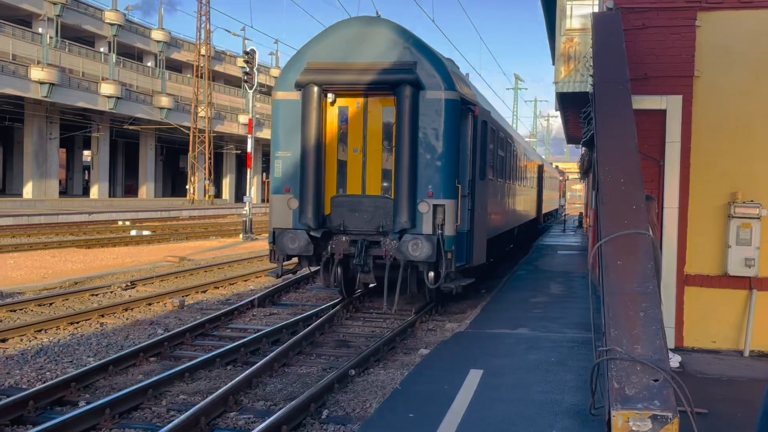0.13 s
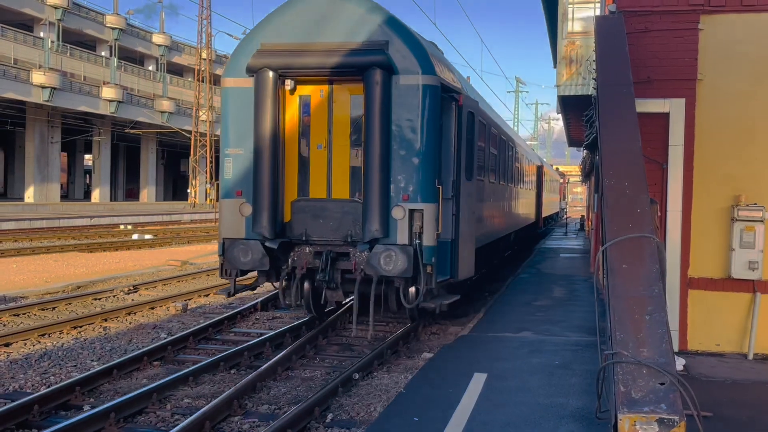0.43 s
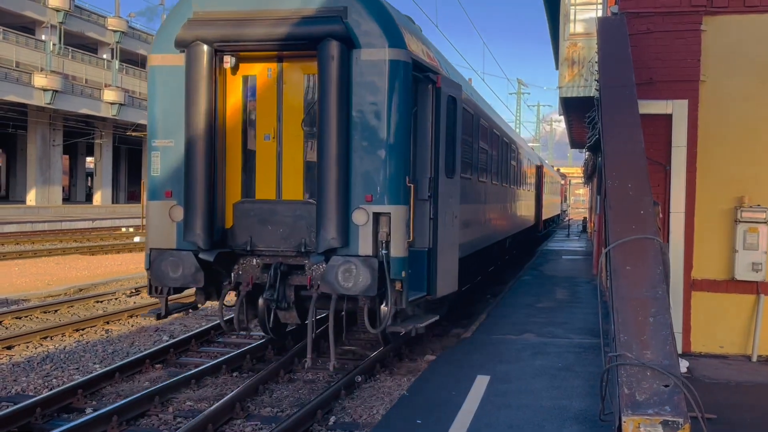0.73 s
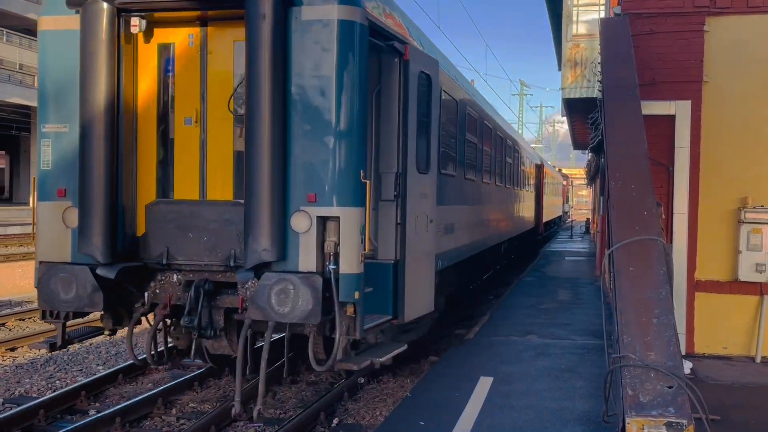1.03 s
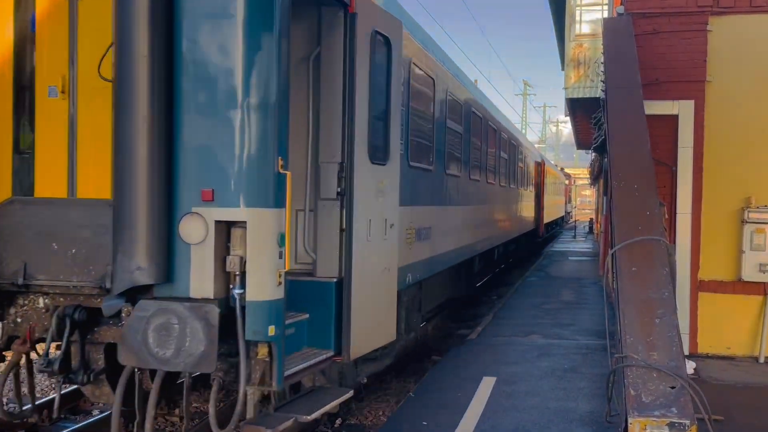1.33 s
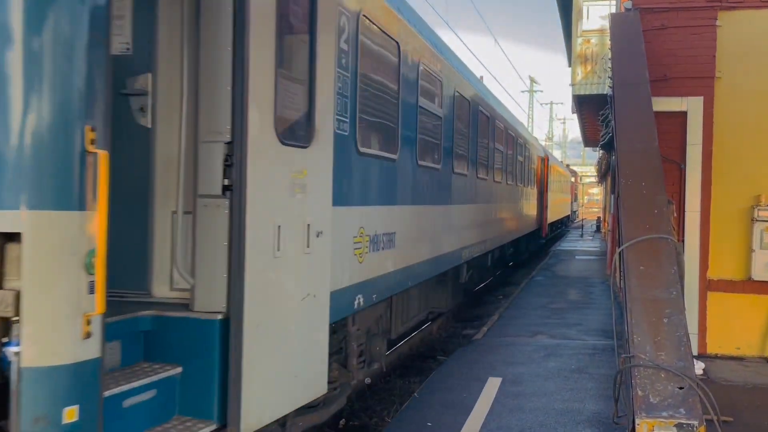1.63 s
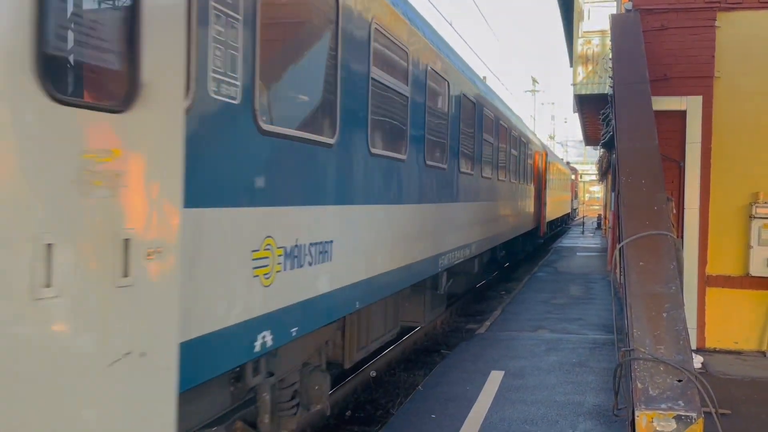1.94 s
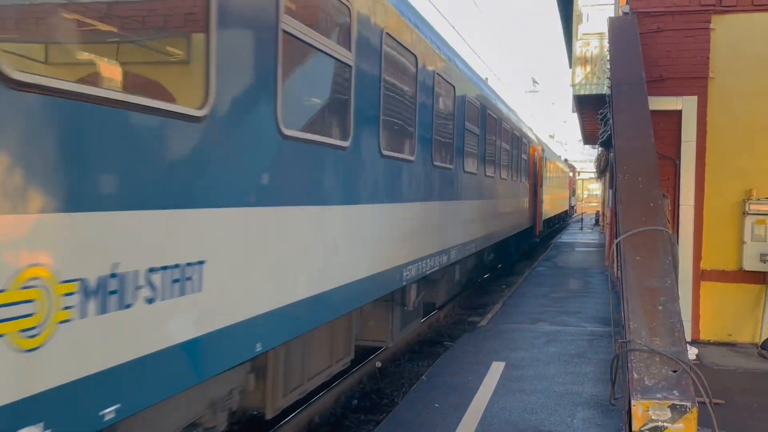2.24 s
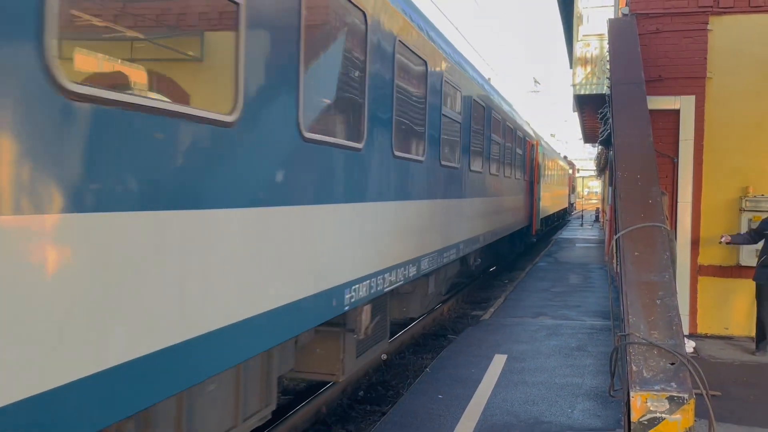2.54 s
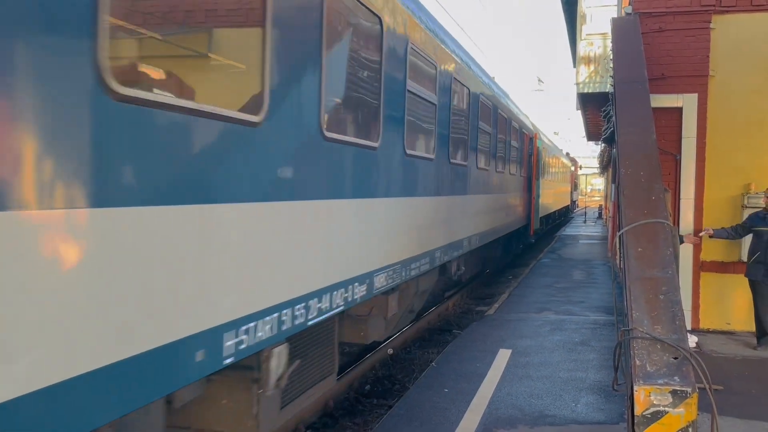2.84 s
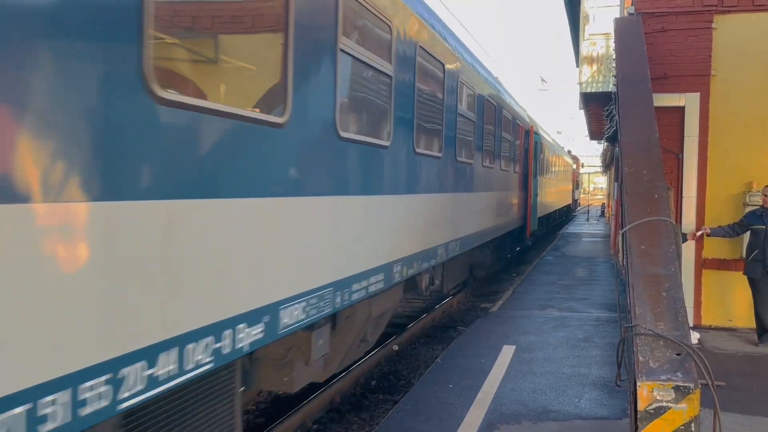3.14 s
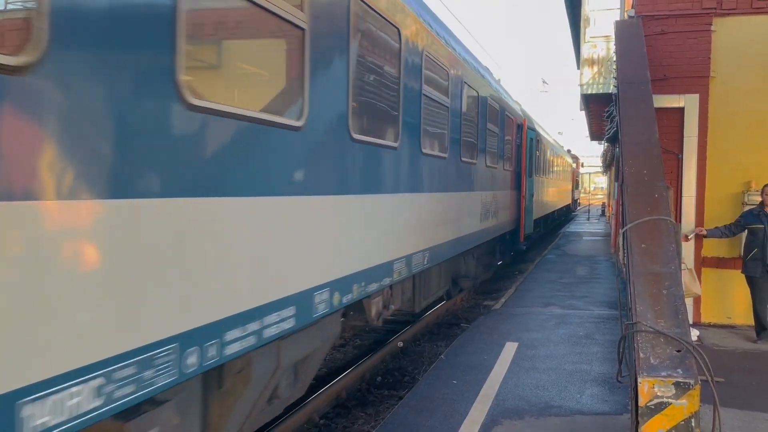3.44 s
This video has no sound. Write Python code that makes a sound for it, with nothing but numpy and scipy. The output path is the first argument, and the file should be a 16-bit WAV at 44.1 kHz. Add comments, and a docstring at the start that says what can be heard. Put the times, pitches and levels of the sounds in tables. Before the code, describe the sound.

Train carriages roll slowly past close to a stereo microphone on an open station platform; heavy clack-thumps cluster in the first second, a quieter rolling stretch follows, then more hard knocks until the end.

```python
"""Station platform, beside the track: passenger carriages roll slowly over points, close to the microphone.
Shaped noise makes the rumble, body drone and wheel roar, with small ringing jolts among them.
At each rail joint a pitched knock sets off a noisy clatter and boom; damped low tones thump as weight lands.
Flanges scrape in the curve, fittings clink and a hollow part clonks; decaying noise gives the walls' answer."""
import sys
import numpy as np
from scipy import signal
from scipy.fft import rfft, irfft, next_fast_len
from scipy.io import wavfile
from scipy.ndimage import map_coordinates

SR = 44100
rng = np.random.default_rng(int(sys.argv[2]) if len(sys.argv) > 2 else 0)


def unload_wav(signal):
    """Save mono or channel-first audio to the path in sys.argv[1] as 16-bit WAV at rate SR, clipped to [-1, 1]."""
    wavfile.write(
        sys.argv[1],
        SR,
        np.round(np.clip(np.atleast_2d(signal).T, -1, 1) * 32767).astype(np.int16),
    )


N = 157437

# Table levels are relative: the trims below and the filters still act on them.
# Rolling noise as it passes: t/s, rumble level/dB, body drone level/dB, wheel roar level/dB
ROLLING_LEVELS = [(.05, -20.5, -30, -30), (.31, -22.5, -27.5, -35), (.6, -23.5, -29.5, -35.5),
                  (0.8, -26, -28.5, -34), (1.15, -31.5, -34, -36), (1.65, -26.5, -28, -33),
                  (1.95, -34, -29, -31.5), (2.25, -25, -24.5, -30.5), (2.48, -28.5, -27, -28),
                  (2.7, -25, -27.5, -31), (3.0, -27.5, -28.5, -29), (3.56, -29.5, -29, -29.5)]
RUMBLE_TRIM_DB, DRONE_TRIM_DB, ROAR_TRIM_DB = 2, 1, 0
# Spectrum of the shaken bogies: f/Hz, level/dB
RUMBLE_SPECTRUM = [(24, -28), (38, -8), (56, 0.5), (85, 0.5), (110, -2.5), (165, -1.5), (250, -24),
                   (600, -94)]
# Spectrum of the car body: f/Hz, level/dB
DRONE_SPECTRUM = [(130, -21.5), (195, -1.5), (230, -6.5), (255, 0.5), (290, -5), (335, -4.5), (385, -12),
                  (1200, -125)]
# Spectrum of wheels on the rail: f/Hz, level/dB
ROAR_SPECTRUM = [(200, -38), (430, 2), (900, 0), (1200, -6.5), (1800, -11.5), (2500, -14), (2900, -17.5),
                 (5200, -26.5), (7000, -33), (9000, -41), (15500, -59)]
# Spectrum of the rattling bogie: f/Hz, level/dB
CLATTER_SPECTRUM = [(90, -18), (200, -4), (320, 6.5), (480, 2.5), (1100, -5), (2400, -10), (3600, -17.5),
                    (5500, -21), (9000, -33), (15500, -48)]
# Spectrum of flanges grinding: f/Hz, level/dB
SCRAPE_SPECTRUM = [(900, 7), (2200, 2), (3800, -4.5), (6500, -11.5), (9000, -21), (15500, -23)]

# Resonances of the steel wheels: f/Hz, lift/dB
WHEEL_RESONANCES = [(825, 2), (2370, 5.5), (2520, 4.5), (2940, 6), (3280, 6.5), (3520, 7.5), (4130, 7.5),
                    (4620, 4), (4920, 8.5)]
WHEEL_WIDTH_HZ = 23

# Rail joints: t/s, knock level/dB, knock f/Hz, knock hold from onset/s,
# clatter level/dB, clatter swell/s, clatter t60/s
RAIL_JOINTS = [(0.281, -24.5, 678, 0.025, -19.5, 0.018, 0.4),
               (0.393, -14.5, 852.6, 0.031, -15, 0.031, 0.24), (0.823, -19, 853, 0.027, -19.5, 0.02, 0.55),
               (2.332, -17, 708, 0.017, -18.5, 0.016, 0.46), (2.764, -15.5, 680, 0.0072, -19, 0.02, 0.6),
               (2.827, -32, 898, 0.023, -23.5, 0.01, 0.47), (3.359, -10, 766, 0.013, -16.5, .040, 0.28)]
# Spectrum of the knock's noise: f/multiple of knock f, level/dB
KNOCK_SPECTRUM = [(.25, -13), (.6, -2.5), (.85, -1.5), (1.03, 0), (1.35, -2.5), (1.8, -7), (2.8, -24.5),
                  (6, -40), (18, -49)]
KNOCK_RISE_S, KNOCK_T60_S = 0.0027, 0.071
KNOCK_TONE_DB, KNOCK_NOISE_DB = -2.5, -1.5
BOOM_DB, BOOM_SWELL_S, BOOM_T60_S = -4.5, 0.02, 0.75  # level relative to the clatter

# Modes of the hollow part: f/Hz, level/dB, swell before it lets go/s
HOLLOW_MODES = [(256, -17.5, 0.081), (826, -19, 0.0086)]
HOLLOW_RELEASE_S = 2.621

# Small jolts: pitch range, ring time, scatter of strength, trim on the drone level
JOLT_LOW_HZ, JOLT_HIGH_HZ, JOLT_T60_S, JOLT_SPREAD_DB, JOLT_TRIM_DB = 260.6, 2575, 0.1, 6, 2.2

# The bogie drops on its springs: t/s, level/dB, base f/Hz
BOGIE_THUMPS = [(.294, -5.5, 92.5), (0.422, -11, 136.5), (0.462, -23, 121), (0.691, -18.5, 298),
                (0.857, -9.5, 131), (0.997, -20, 101), (2.346, -18, 157), (2.838, -8.5, 80),
                (3.259, -4.5, 114), (3.387, -9, 152)]
# Modes of every thump: f/multiple of base f, level/dB, t60/s
THUMP_MODE_TABLE = [(.62, -4, 0.1), (1.001, 2, 0.045), (1.498, -4.5, 0.074)]
THUMP_RISE_S = 0.0087

# Flange scrapes: t/s, hold from onset/s, grinding level/dB, ringing level/dB
FLANGE_SCRAPES = [(0.119, 0.087, -30, -39.5), (0.304, 0.017, -40, -38.5), (0.425, 0.036, -24.5, -44),
                  (0.542, 0.052, -28, -41), (0.852, 0.072, -31, -40), (1.634, 0.057, -39, -77),
                  (3.081, 0.069, -33.5, -47), (3.245, 0.044, -30.5, -57), (3.424, 0.13, -37.5, -56.5)]
SCRAPE_RISE_S, SCRAPE_T60_S = 0.029, 0.35
# Wheel resonances excited by the flanges: f/Hz, level/dB
FLANGE_RESONANCES = [(4610, 1), (5360, 2.5), (5540, 2), (10360, -2), (10640, -3)]
FLANGE_WIDTH_HZ = 105

# Taps of loose fittings: t/s, level/dB, centre f/Hz
FITTING_CLINKS = [(1.623, -32.5, 705), (1.774, -23.5, 1460), (1.823, -34, 3840), (2.08, -34.5, 900),
                  (2.108, -45, 7600)]
# Spectrum of a tap: f/multiple of centre f, level/dB
CLINK_SPECTRUM = [(.2, -3), (.7, 2), (1, 4), (1.25, -11), (2.2, -15.5), (8, -44.5)]
CLINK_T60_S = 0.21

# Likeness of the left and right channels by frequency: f/Hz, likeness (1 alike, -1 opposed)
STEREO_LIKENESS = [(60, 0.99), (250, 0.88), (800, 0.54), (3300, .8), (4000, 1), (6100, 0.98), (6600, -0.48),
                   (7200, -1), (8100, -0.94), (9200, 0.045), (10200, 0.98), (11900, 0.74), (13300, -0.99)]
# Reverberation of the station walls: f/Hz, t60/s
WALL_DECAY = [(1000, 1), (12000, 0.42)]
WALLS_DB = -17.5
# Left-over-right imbalance of the microphone: f/Hz, difference/dB
MIC_BALANCE = [(250, -1.44), (500, 0.6)]
MIC_LOW_CUT_HZ, MIC_TOP_HZ, MIC_OPENS_S = 28, 15700, .044


def amp(db):
    """Decibels to gain."""
    return 10 ** (np.asarray(db) / 20)


def unit(x):
    """Scale to rms 1."""
    return x / np.sqrt(np.mean(x ** 2) + 1e-20)


def along(points, hz):
    """Read (f/Hz, value) points on a log frequency axis."""
    f, value = np.transpose(points)
    return np.interp(np.log(hz + 1e-6), np.log(f), value)


def shape(points, scale=1):
    """The gain response of a dB spectrum, its frequencies multiplied by scale."""
    return lambda hz: amp(along(points, hz / scale))


def resonances(rows):
    """The summed response of (f/Hz, width/Hz, level/dB) resonances, alternating in sign."""
    def response(f):
        total = 0
        for k, (centre, width, db) in enumerate(rows):
            damping = 1j * f * width
            total = total + (-1) ** k * amp(db) * damping / (centre * centre - f * f + damping)
        return total
    return response


def filtered(x, response):
    """Multiply the spectrum of x by a response of frequency."""
    m = next_fast_len(N + SR // 4)
    return irfft(rfft(x, m) * response(np.fft.rfftfreq(m, 1 / SR)), m)[..., :N]


def wobble(rate):
    """A smooth random curve with rate knots a second."""
    return map_coordinates(rng.standard_normal(4096), [np.arange(N) * rate / SR], mode="wrap")


def noise(response, drive=1):
    """Stereo noise of rms 1: random contact forces, scaled by drive, through a response."""
    forces = drive * rng.standard_normal((2, N))
    return unit(stereo(filtered(forces, response)))


def envelope(start, rise, hold, t60):
    """Linear rise, level until hold after the start, then exponential decay."""
    t = np.arange(N) / SR - start
    return np.clip(t / rise, 0, 1) * amp(-60 * np.maximum(t - hold, 0) / t60)


def stereo(pair):
    """Two unrelated signals made into left and right with a set likeness per band."""
    def mid_side(hz):
        angle = np.arccos(np.clip(along(STEREO_LIKENESS, hz), -1, 1)) / 2
        return np.array([np.cos(angle), np.sin(angle)])
    mid, side = filtered(pair, mid_side)
    return np.array([mid + side, mid - side])


def walls(x):
    """Reverberation of the station, fed from the left channel, each frequency dying at its own speed."""
    hz, t, z = signal.stft(rng.standard_normal((2, SR // 2)), SR, nperseg=256)
    fade = amp(-60 * t / along(WALL_DECAY, hz)[:, None])
    tail = signal.istft(z * fade, SR, nperseg=256)[1]
    tail = tail / np.linalg.norm(tail[0])
    return stereo(signal.fftconvolve(x[:1], tail, axes=1)[:, :N])


def jolts(count):
    """Small random knocks, each ringing one panel of the underframe; higher panels ring more weakly."""
    t = np.arange(SR // 4) / SR
    out = np.zeros(N + len(t))
    fade = np.minimum(t / KNOCK_RISE_S, 1) * amp(-60 * t / JOLT_T60_S)
    for when, panel, weakness in rng.random((count, 3)):
        hz = JOLT_LOW_HZ * (JOLT_HIGH_HZ / JOLT_LOW_HZ) ** panel
        strength = amp(-JOLT_SPREAD_DB * weakness) * JOLT_LOW_HZ / hz
        out[int(when * N):][:len(t)] += strength * fade * np.sin(2 * np.pi * hz * t)
    return out[:N]


def rolling():
    """Rough rails shake the bogies, make the car body drone in uneven surges and roar at the wheels."""
    s, *levels = np.transpose(ROLLING_LEVELS)
    rumble_db, drone_db, roar_db = [np.interp(np.arange(N) / SR, s, level) for level in levels]
    # the wobbles, in dB, make each contact force uneven
    rumble = noise(shape(RUMBLE_SPECTRUM), amp(2.76 * wobble(14)))
    drone = noise(shape(DRONE_SPECTRUM), amp(1.2 * wobble(25.07)))
    roar = noise(shape(ROAR_SPECTRUM), amp(1.26 * wobble(45)))
    return (amp(RUMBLE_TRIM_DB + rumble_db) * rumble
            + amp(DRONE_TRIM_DB + drone_db) * drone
            + amp(JOLT_TRIM_DB + drone_db) * jolts(count=170)
            + amp(ROAR_TRIM_DB + roar_db) * roar)


def clinks():
    """Loose fittings tap and tick: short bursts of noise around a centre frequency."""
    out = np.zeros((2, N))
    for s, db, hz in FITTING_CLINKS:
        out += amp(db) * envelope(s, 0.00067, .004, CLINK_T60_S) * noise(shape(CLINK_SPECTRUM, hz))
    return out


def hollow_knock():
    """A hollow part of the carriage starts to hum under strain, then lets go with a short clonk."""
    t = np.arange(N) / SR
    out = np.zeros(N)
    for hz, db, swell in HOLLOW_MODES:
        hum = envelope(HOLLOW_RELEASE_S - swell, swell, swell, KNOCK_T60_S)
        out += amp(db) * hum * np.sin(2 * np.pi * hz * t)
    return out


def scrapes():
    """Flanges grind on the rail in uneven slips and excite narrow, high wheel resonances."""
    grind_level, ring_level = np.zeros(N), np.zeros(N)
    for s, length, grind_db, ring_db in FLANGE_SCRAPES:
        stroke = envelope(s, SCRAPE_RISE_S, length, SCRAPE_T60_S)
        grind_level += amp(grind_db) * stroke
        ring_level += amp(ring_db) * stroke
    slips = amp(1.07 * wobble(120))
    ringing = resonances([(hz, FLANGE_WIDTH_HZ, db) for hz, db in FLANGE_RESONANCES])
    grind = noise(shape(SCRAPE_SPECTRUM), slips)
    ring = noise(ringing, slips * amp(3.7 * wobble(19)))
    return grind_level * grind + ring_level * ring


def thumps():
    """A few damped low cycles as the weight lands."""
    out, t = np.zeros(N), np.arange(N) / SR
    for s, db, hz in BOGIE_THUMPS:
        for ratio, mode_db, t60 in THUMP_MODE_TABLE:
            tone = np.sin(2 * np.pi * hz * ratio * (t - s))
            out += amp(db + mode_db) * envelope(s, THUMP_RISE_S, THUMP_RISE_S, t60) * tone
    return out


def joints():
    """A wheel knocks across the gap; bogie rattle and body boom swell after it and die away."""
    out, boom_level, t = np.zeros((2, N)), np.zeros(N), np.arange(N) / SR
    for s, knock_db, hz, length, clatter_db, swell, t60 in RAIL_JOINTS:
        # a slightly unsteady phase roughens the pitch
        tone = np.sin(2 * np.pi * hz * (t - s) + 0.94 * wobble(200))
        knock = amp(KNOCK_TONE_DB) * tone + amp(KNOCK_NOISE_DB) * noise(shape(KNOCK_SPECTRUM, hz))
        out += amp(knock_db) * envelope(s, KNOCK_RISE_S, length, KNOCK_T60_S) * knock
        clatter = noise(shape(CLATTER_SPECTRUM), amp(1.07 * wobble(200)))
        out += amp(clatter_db) * envelope(s, swell, swell, t60) * clatter
        boom_level += amp(clatter_db + BOOM_DB) * envelope(s, BOOM_SWELL_S, BOOM_SWELL_S, BOOM_T60_S)
    return out + boom_level * noise(shape(DRONE_SPECTRUM))


def wheels(x):
    """The steel wheels lift their own resonances out of every direct sound."""
    def response(f):
        lift = 1
        for hz, db in WHEEL_RESONANCES:
            lift = lift + (amp(db) - 1) * resonances([(hz, WHEEL_WIDTH_HZ, 0)])(f)
        return lift
    return filtered(x, response)


def scene():
    """The train close by, with the station walls answering its blows."""
    blows = joints() + thumps() + scrapes() + clinks() + hollow_knock()
    return wheels(blows + rolling()) + amp(WALLS_DB) * walls(blows)


def record(dry):
    """The microphone has a low cut, a slight imbalance and a band limit; it opens just after the start."""
    def colour(hz):
        balance = amp(np.array([[.5], [-.5]]) * along(MIC_BALANCE, hz))
        return balance * hz ** 4 / (hz ** 4 + MIC_LOW_CUT_HZ ** 4)
    opened = np.clip((np.arange(N) / SR - MIC_OPENS_S) / .005, 0, 1)  # 5 ms fade-in
    return filtered(opened * filtered(dry, colour), lambda hz: hz < MIC_TOP_HZ)


dry = scene()
out = record(dry)
unload_wav(out)
```